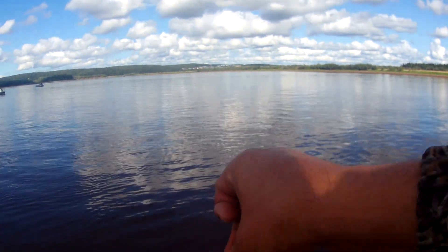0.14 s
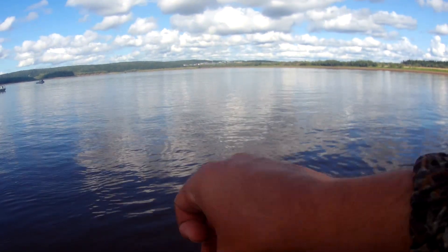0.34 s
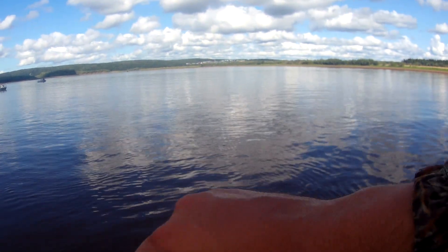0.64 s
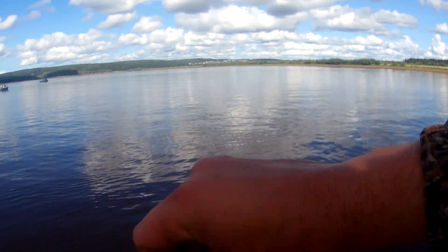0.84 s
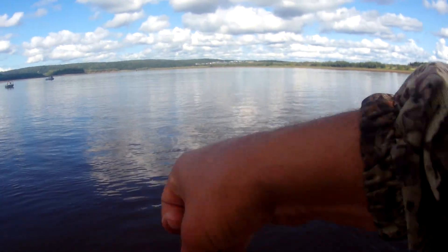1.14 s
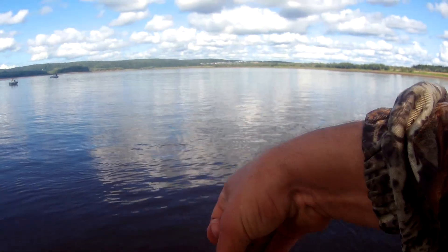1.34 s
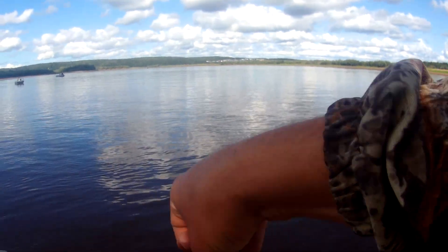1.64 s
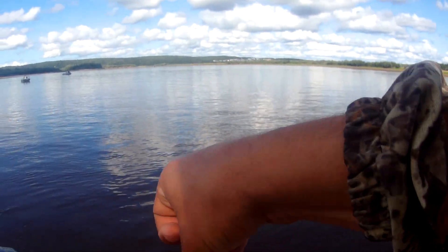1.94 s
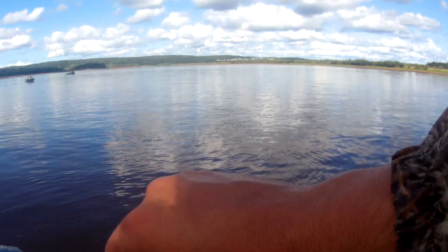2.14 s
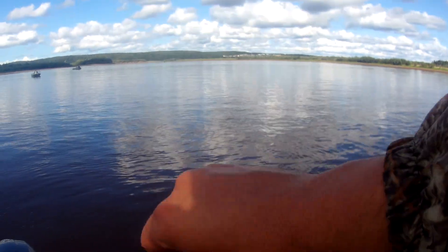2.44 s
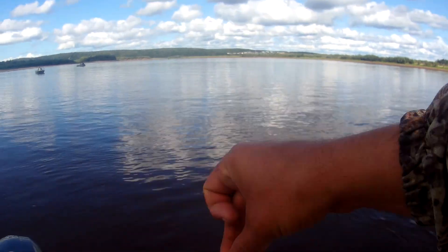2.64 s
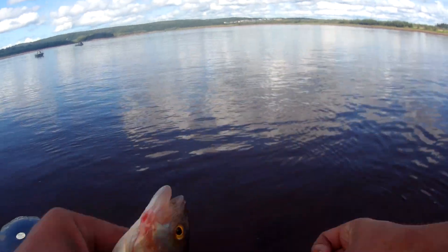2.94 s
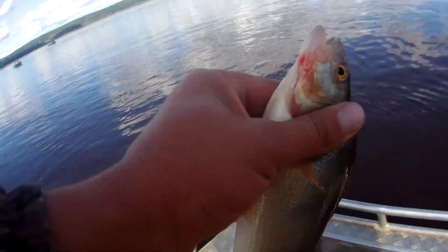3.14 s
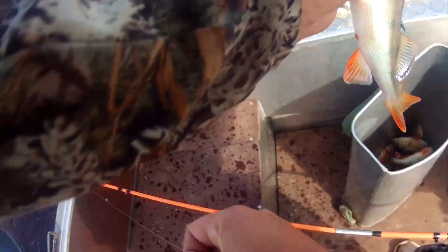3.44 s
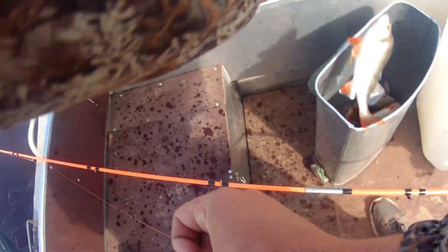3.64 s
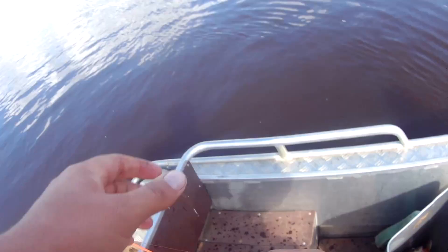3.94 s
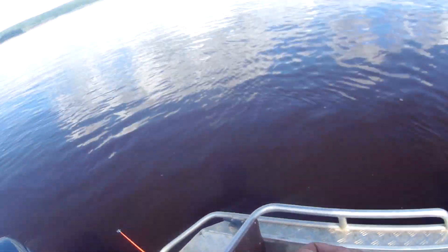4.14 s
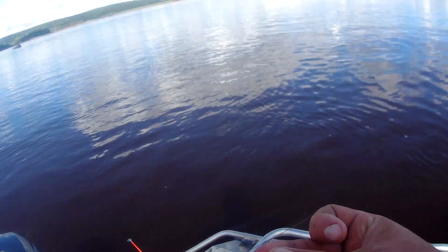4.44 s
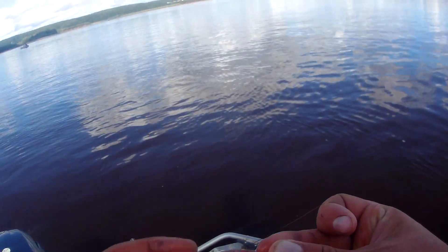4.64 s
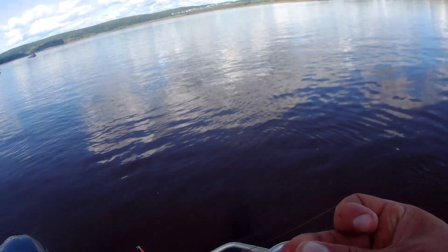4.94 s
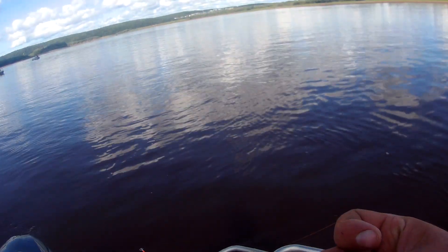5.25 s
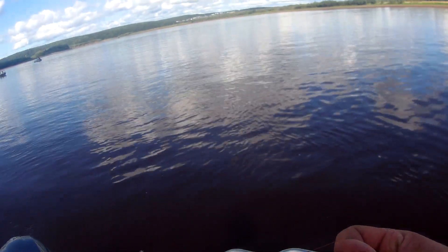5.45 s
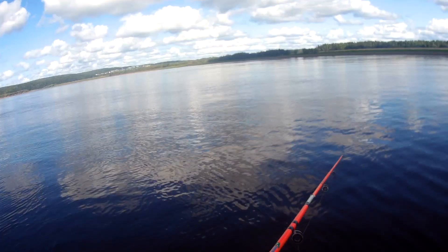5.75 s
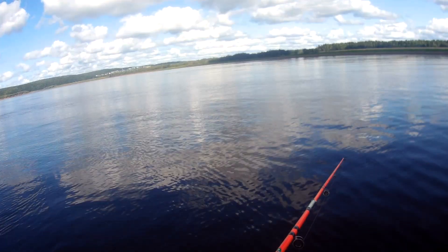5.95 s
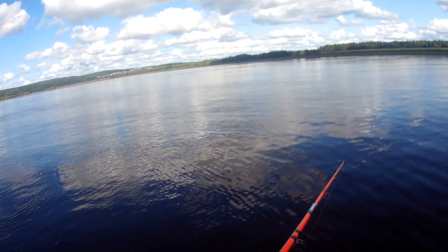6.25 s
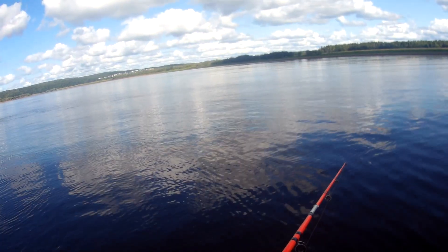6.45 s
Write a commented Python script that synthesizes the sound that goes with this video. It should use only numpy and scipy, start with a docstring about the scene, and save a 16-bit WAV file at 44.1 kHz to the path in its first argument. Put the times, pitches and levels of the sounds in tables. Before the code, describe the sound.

A close, body-worn microphone on an aluminium boat picks up broad, gently lapping water, faint flickering hiss and a low, wavering engine hum. From 0.4 to 1.4 s there are only faint ticks and a short rub. Light hollow knocks fall at 1.5 and 1.65 s, then a brighter, firmer double knock with ticks and rubbing around 2.0-2.2 s. Background alone fills the gap until a faint tap and soft sliding at 3.5 s. At 3.88-4.1 s comes the loudest moment: a tumbling clatter of thuds, clanks and sharp ticks, rough scraping and a dull low jolt that decays. Weaker knocks and rubs follow at 4.25-4.65 s, a solid double knock at 5.0 s, and ringing knocks at 5.3 and 5.5-5.6 s. At 5.6 s it cuts hard to a much quieter lake; rubbing ends, a thin, warbling, very high squeak slips at 5.7-5.8 s, then calm until a tiny dry tock at 6.53 s.

```python
"""Fishing gear on an aluminium boat

Hands and gear knock, tick and rub on the hull, close to a body-worn camera: decaying tones and shaped noise.
Engine hum (wavering low tones), the wash of the lake and hiss (filtered noise) lie underneath.
After a hard cut the lake is quieter: a thin, high squeak of gliding tones as the rod is worked,
the end of the rubbing, and one last small tock."""
import sys
import numpy as np
from scipy import signal
from scipy.fft import rfft, irfft
from scipy.io import wavfile

SR = 44100
rng = np.random.default_rng(int(sys.argv[2]) if len(sys.argv) > 2 else 0)


def output_pcm(signal):
    """Save a mono or channel-first signal as 16-bit PCM at the path in sys.argv[1].

    Samples are clipped to [-1, 1] before scaling.
    """
    pcm = np.clip(np.atleast_2d(signal).T, -1, 1) * 32767
    wavfile.write(sys.argv[1], SR, np.round(pcm).astype(np.int16))


N = 291545
T = np.arange(N) / SR  # time in seconds
# Throughout, a t60 is the time in seconds in which a sound dies away by 60 dB.


def amp(db):
    """Turns decibels into gain."""
    return 10 ** (np.asarray(db) / 20)


def rms(x):
    """Root mean square: the average strength of a signal."""
    return np.sqrt(np.mean(x ** 2) + 1e-20)


def read(points, hz):
    """Reads a curve of (Hz, value) points, joined by lines on a log-frequency axis."""
    f, value = np.transpose(points)
    return np.interp(np.log(hz + 1), np.log(f + 1), value)


def add(mix, s, sound):
    """Mixes a sound in at time s (seconds)."""
    part = mix[round(s * SR):][:len(sound)]
    part += sound[:len(part)]


def band(x, lo_hz, hi_hz, order=3):
    """Keeps the range between two frequencies, using past samples only."""
    edges = [lo_hz, min(hi_hz, .49 * SR)]
    return signal.sosfilt(signal.butter(order, edges, "band", fs=SR, output="sos"), x)


def noise(points, size=N):
    """Noise of a given spectrum, rms 1."""
    gain = amp(read(points, np.fft.rfftfreq(size, 1 / SR)))
    x = irfft(rfft(rng.standard_normal(size)) * gain, size)
    return x / rms(x)


def drift(rate):
    """Random wander of rms 1: 16 sines of up to the given rate (Hz), drawn on 4000 points and joined by lines."""
    t = np.linspace(0, N / SR, 4000)
    x = sum(np.sin(2 * np.pi * (f * t + rng.random())) for f in rate * rng.uniform(.1, 1, 16))
    return np.interp(T, t, x / rms(x))


def colour(x, points):
    """Filters with a gain curve of (Hz, dB) points, with no sound ahead of its cause (minimum phase)."""
    size = 4096
    log_gain = np.log(amp(read(points, abs(np.fft.fftfreq(size, 1 / SR)))))
    taps = np.fft.ifft(np.exp(np.conj(signal.hilbert(log_gain)))).real
    return signal.fftconvolve(x, taps[:size // 2])[:len(x)]


# Tones of the engine hum. Each row: pitch in Hz, level in dB rms before throb and sinking.
ENGINE_TONES = [(91.4, -47.5), (136.8, -52), (182.6, -53)]
# Tones of the fainter hum over the calm lake. Each row: pitch in Hz, level in dB rms before throb.
FAR_ENGINE_TONES = [(117.8, -61.5), (172.6, -62)]


def hum(lines, waver=0.0031, throb_db=2):
    """Low tones share one slightly wandering engine speed, while each throbs in level by itself."""
    clock = np.cumsum(1 + waver * drift(2.11)) / SR
    out = 0
    for hz, db in lines:
        level = np.sqrt(2) * amp(db + throb_db * drift(5.1))
        out = out + level * np.sin(2 * np.pi * (hz * clock + rng.random()))
    return out


# Spectrum of the wash beside the boat. Each row: frequency in Hz, relative level in dB per Hz.
WASH_SPECTRUM = [(20, -8), (40, -10.5), (280, 0.5), (450, -1.5), (850, -8), (1150, -18.5), (3200, -29.5),
                 (5600, -31.5), (12600, -35), (15700, -60)]
# Slow swell of that wash. Each row: time in seconds, level of its 200-1000 Hz range in dB before lapping.
WASH_SWELL = [(0, -43.5), (1.1, -43.5), (1.9, -41), (3.6, -44.5), (4.2, -39.5), (5.6, -41)]
# Spectrum of the calm lake. Each row: frequency in Hz, relative level in dB per Hz.
CALM_SPECTRUM = [(20, -22), (40, -3), (65, -16), (420, -19.5), (2200, -38.5), (5000, -42.5), (15700, -51)]
CALM_DB = -55.5  # level of its 200-1000 Hz range before lapping


def wash(points, db, lap_db=1.4):
    """Water and air over the lake make broad noise; its part below about 1200 Hz laps gently in level."""
    x = noise(points)
    body = band(x, 200, 1000)
    low = signal.sosfiltfilt(signal.butter(2, 1200, fs=SR, output="sos"), x)
    lapping = low * (amp(lap_db * drift(12)) - 1)
    return amp(db) * (x + lapping) / rms(body)


# Bands of microphone hiss. Each row: centre in Hz, width in Hz, level in dB rms before flicker.
HISS_BANDS = [(7440, 310, -66), (12850, 1500, -64)]


def hiss(flicker_db=3.5):
    """Bands of microphone hiss, made of filtered noise, flicker together in level."""
    out = 0
    for hz, width, db in HISS_BANDS:
        x = band(rng.standard_normal(N), hz - width / 2, hz + width / 2, order=1)
        out = out + amp(db) * x / rms(x)
    return amp(flicker_db * drift(22)) * out


# Strongest ringing modes of the hull. Each row: pitch in Hz, relative level in dB, t60 in seconds.
HULL_MODES = [(130, -11.5, 0.6), (184.3, 2, 0.32), (265.3, 5.5, 0.19), (375.6, 0, 0.17), (465, -3.5, 0.3),
              (530.4, -3.5, 0.21), (621, -3.5, 0.39), (715, -0.5, 0.27), (773, -0.5, 0.43), (827, -1, 0.19),
              (1135, -6, 0.24), (1406, -3.5, 0.16), (1841, -9.5, 0.16)]
# The crowd of weaker sheet modes between them. Each row: frequency in Hz, relative level in dB per Hz.
SHEET_SPECTRUM = [(70, -8), (160, 6), (400, 1), (750, 6), (1400, 0), (2000, -2.5), (2500, -15),
                  (4400, -15.5), (5600, -26.5), (8000, -21.5), (9500, -38), (15000, -46)]
# How long that crowd rings. Each row: frequency in Hz, t60 in seconds.
SHEET_DECAY = [(150, 0.39), (700, 0.53), (1500, 0.26), (4000, 0.11), (12000, 0.12)]


def hull_ring(hold, modes_db=3.5, spread_db=2.0, detune=0.0072):
    """One blow excites strong modes, randomly weighted and detuned, among a crowd of weak ones; hold scales t60."""
    t = T[:SR // 2]
    hz, db, t60 = np.transpose(HULL_MODES)[:, :, None]
    place, angle, load = rng.standard_normal((3, len(HULL_MODES), 1))
    hz = hz * (1 + detune * load)
    level = amp(db + spread_db * place - 60 * t / (t60 * hold))
    modes = (level * np.sin(2 * np.pi * (hz * t + angle))).sum(0)
    # the crowd is noise that dies away at its own speed at each frequency
    f, when, z = signal.stft(noise(SHEET_SPECTRUM, len(t)), SR, nperseg=256)
    fade = amp(-60 * when / (hold * read(SHEET_DECAY, f)[:, None]))
    crowd = signal.istft(z * fade, SR, nperseg=256)[1][:len(t)]
    return amp(modes_db) * modes / rms(modes) + crowd / rms(crowd)


# Light ticks of tackle. Each row: start in seconds, peak in dB without the hull's answer, pitch of tick in Hz.
TACKLE_TICKS = [(0.449, -42, 3000), (0.789, -35.5, 1150), (1.031, -36.5, 8300), (1.393, -32.5, 1000),
                (1.412, -35, 900), (1.444, -39, 8500), (1.9002, -37.5, 1900), (2.036, -30.5, 1500),
                (2.1464, -26.5, 4250), (3.746, -34.5, 5400), (3.806, -30, 5270), (3.882, -24.5, 6300),
                (3.8947, -18, 6270), (4.016, -27, 8040), (4.3378, -30.5, 4880), (4.5603, -32, 6500),
                (4.6298, -29, 8000), (5.2139, -34.5, 3800), (5.245, -33.5, 4500)]


def ticks(t60=0.028, ring_db=-6, ring_t60=0.057, hull_db=-7):
    """A small hard contact gives a noise snap, a short ring at its own pitch and a fainter answer from the hull."""
    out, t = np.zeros(N), T[:SR // 10]
    for s, db, hz in TACKLE_TICKS:
        snap = band(rng.standard_normal(len(t)), 900, 14000, order=2)
        snap = band(snap, hz / 1.5, hz * 1.5, order=1)
        ring = amp(ring_db - 60 * t / ring_t60) * np.sin(2 * np.pi * hz * t)
        tick = snap / rms(snap) * amp(-60 * t / t60) + ring
        answer = hull_ring(hold=1.0)
        add(out, s, amp(db) * tick / abs(tick).max())
        add(out, s, amp(db + hull_db) * answer / abs(answer).max())
    return out


# Sleeve and gear sliding over metal. Each row: start in seconds, length in seconds,
# level in dB before graining, resonance in Hz, extra treble in dB.
RUB_STROKES = [(1.155, 0.11, -41, 3180, 1.5), (1.423, 0.22, -43, 760, -1.5), (1.915, 0.044, -39, 2590, -3),
               (2.169, 0.092, -35, 736, 0), (3.434, 0.29, -44, 1240, -0.5), (3.875, 0.19, -33.5, 1090, 7.5),
               (4.043, 0.034, -29.5, 1140, -1), (4.094, 0.35, -38.5, 1240, 2.5),
               (4.222, 0.044, -45, 7700, 27), (4.401, 0.69, -44.5, 730, 0.5), (5.43, 0.2, -39.5, 1000, -2),
               (5.698, 0.16, -50.5, 750, 6)]
# Spectrum common to the strokes. Each row: frequency in Hz, relative level in dB per Hz.
RUB_SPECTRUM = [(100, 6), (800, 4.5), (2000, -3), (2600, -13.5), (4400, -7.5), (5500, -20.5), (8000, -9.5),
                (9500, -19), (15000, -23)]


def rubs(grain_db=1.0, grain_rate=420, metal_db=-12, surge_db=1.14, surge_rate=25,
         resonance_db=6, resonance_octaves=0.47, treble_hz=5200,
         catch_rate=24, catch_db=2.5, catch_s=0.0038):
    """Grained noise strokes slide with their own resonance and sheen, catch at random and set the hull ringing."""
    dry, hz = np.zeros(N), np.geomspace(100, 15000, num=60)
    for s, length, db, centre_hz, treble_db in RUB_STROKES:
        resonance = resonance_db * np.exp(-(np.log2(hz / centre_hz) / resonance_octaves) ** 2)
        shape = read(RUB_SPECTRUM, hz) + resonance + treble_db * (hz > treble_hz)
        size = int(length * SR)
        stroke = noise(list(zip(hz, shape)), SR)[:size]
        add(dry, s, amp(db) * signal.windows.tukey(size, .6) * stroke)
    grain = amp(grain_db * drift(grain_rate) + surge_db * drift(surge_rate))
    # catches: random jumps in level, catch_rate a second on average, that die away within milliseconds
    starts = rng.random(N) < catch_rate / SR
    catches = signal.lfilter([1], [1, -np.exp(-1 / (catch_s * SR))], starts)
    grain = grain * (1 + amp(catch_db) * catches)
    dry = dry * grain / rms(grain)
    metal = signal.fftconvolve(dry, band(hull_ring(hold=0.12), 310, 6000))[:N]
    return dry + amp(metal_db) * metal * rms(dry) / rms(metal)


def travel(x, delay_s):
    """Bending waves spread out on their way through the sheet: the lower, the later (delay_s at 200 Hz)."""
    hz = np.fft.rfftfreq(2 * len(x), 1 / SR)
    delay = delay_s * (200 / np.maximum(hz, 100)) ** .8
    turn = np.exp(-2j * np.pi * np.cumsum(delay) * hz[1])  # summed delay gives the phase
    return irfft(rfft(x, 2 * len(x)) * turn)[:len(x)]


def chatter(size, gap_s=0.0072, contact_s=0.00068, contact_db=3, settle_s=0.056, press_s=0.00054):
    """Gear never lands cleanly: a few quick, weakening contacts each lift the ring for an instant."""
    contacts = np.r_[0, np.cumsum(gap_s * rng.uniform(.4, 1.6, size=6))][:, None]
    age = np.maximum(T[:size] - contacts, 0)
    press = 1 - np.exp(-age / press_s)
    release = np.exp(-age / contact_s - contacts / settle_s)
    return 1 + amp(contact_db) * (press * release).sum(0)


def panel(hz, second_hz, hold, t60=0.13, second_db=-4):
    """The patch of sheet that is struck rings at two pitches of its own; hold scales t60."""
    t = T[:SR // 2]
    tones = np.sin(2 * np.pi * hz * t) + amp(second_db) * np.sin(2 * np.pi * second_hz * t)
    return amp(-60 * t / (t60 * hold)) * tones


# Blows on the hull. Each row: start in seconds, strength in dB, weight behind it as extra bass in dB,
# hardness as treble slope in dB per octave, ring time as a factor (under 1 when a hand damps it, at least 0.1),
# main and second pitch of the struck panel in Hz, early level of that panel against the strength in dB.
HULL_BLOWS = [(1.5155, -30.5, -3.5, 0.5, 0.71, 734, 4220, -3), (1.643, -40, 5, -1.5, 0.7, 705, 4170, -9),
              (1.993, -32, -2, -1, 0.85, 265, 1400, -6), (2.1595, -21, -19, -5, 0.59, 627, 946, -1.5),
              (2.175, -28, -4.5, -4.5, 0.93, 830, 602, -0.5), (3.492, -42, -16.5, -4.5, 0.18, 966, 896, 2),
              (3.881, -25.5, 3, -13.5, 1.2, 329, 167, -0.5), (3.892, -26.5, 1.5, -3.5, 0.5, 473, 960, -1),
              (3.907, -24.5, 5.5, -5.5, 0.42, 360, 1275, -2.5),
              (3.932, -22.5, -2.5, -8.5, 0.82, 553, 1027, -3), (3.98, -27.5, -0.5, -11, 0.94, 623, 458, 2),
              (4.0712, -18, -5.5, -8, 0.29, 1237, 470, -7), (4.083, -19.5, 0.5, -7, 0.78, 375, 527, 1),
              (4.096, -25, 4, -8, 0.73, 206, 259.5, 5), (4.254, -36.5, -3, -5, 1.2, 725, 782, 3.5),
              (4.398, -44.5, 5, -20, 0.4, 256, 192, 12), (4.512, -31, -8, -5.5, 0.29, 703, 1325, 4),
              (4.628, -35, -0.5, -5.5, 0.27, 406, 716, 0.5), (5.007, -26, -1.5, -3.5, 0.66, 1420, 1420, -2),
              (5.012, -22, 1, -6.5, 0.84, 640, 387, 2), (5.275, -29.5, 0, -4.5, 1.34, 190.4, 131, 2.5),
              (5.4879, -26.5, -3, -7, 0.6, 718, 682, 6), (5.499, -34.5, 2, -1, 1.3, 187.6, 254, 11.5),
              (5.592, -27, -10, -2.5, 1.4, 822, 1320, -5)]
# Centres of thump, ring, clang and crack, in Hz.
BLOW_CENTRES = [250, 750, 1550, 4000]
# Levels of thump, ring, clang and crack in a neutral blow, in dB against its strength.
BLOW_BALANCE = [-2, -1.5, -5, -3]


def knocks(rise_s=0.00093, travel_s=0.00508, hard_db=-8, soft_span_db=4):
    """Heavy, soft flesh drives the low modes and spreads out in time; hard gear drives the high ones at once."""
    out = np.zeros(N)
    edges = [80, 450, 1100, 2400, 15000]  # limits of thump, ring, clang and crack (Hz)
    early = SR // 36  # levels are set over the first 28 ms
    octaves = np.log2(np.divide(BLOW_CENTRES, BLOW_CENTRES[1]))
    for s, db, weight_db, hardness, hold, hz, second_hz, panel_db in HULL_BLOWS:
        hold = max(hold, .1)
        levels = db + np.array(BLOW_BALANCE)
        levels = levels + weight_db * (octaves < 0) + hardness * np.maximum(octaves, 0)
        ring = hull_ring(hold)
        contact = chatter(len(ring)) * (1 - np.exp(-T[:len(ring)] / rise_s))
        ring, note = ring * contact, panel(hz, second_hz, hold) * contact
        for _ in range(2):  # neighbouring ranges overlap, so the weights settle in two steps
            own = [20 * np.log10(rms(band(ring[:early], lo, hi))) for lo, hi in zip(edges, edges[1:])]
            ring = colour(ring, list(zip(BLOW_CENTRES, levels - own)))
        ring = ring + amp(panel_db + db) * note / rms(note[:early])
        softness = 1 / (1 + np.exp((hard_db - weight_db) / soft_span_db))  # more weight, nearer 1
        add(out, s, travel(ring, travel_s * softness))
    # the knocks carry little deep bass below about 94 Hz
    return signal.sosfilt(signal.butter(3, 94, "high", fs=SR, output="sos"), out)


# The first heavy blow jolts the camera: start (s), level before rise and decay (dB), t60 (s).
JOLT_S, JOLT_DB, JOLT_T60 = 3.885, -29, 0.79


def jolt(lo_hz=32, hi_hz=125, rise_s=0.0043):
    """A jolt through the camera's mount is a dull rumble of low noise that rises fast and dies away."""
    age = np.maximum(T - JOLT_S, 0)
    x = band(rng.standard_normal(N), lo_hz, hi_hz)
    return amp(JOLT_DB - 60 * age / JOLT_T60) * (1 - np.exp(-age / rise_s)) * x / rms(x)


# Slips of the squeak. Each row: start in seconds, length in seconds, level in dB rms before fades and flutter,
# middle pitch in Hz before arch, sag and warble.
SQUEAK_SLIPS = [(5.693, 0.02, -43.5, 11300), (5.717, 0.05, -35.5, 10670), (5.77, 0.029, -40.5, 10230)]
# Each slip arches in pitch (Hz), sags (Hz per second), and starts and stops quickly (s).
SLIP_ARCH_HZ, SLIP_SAG_HZ_PER_S, SLIP_EDGE_S = 353, 2100, 0.0044


def squeak(warble_hz=210, warble_rate=190, flutter_db=3.0):
    """As the rod is worked, a high tone slips a few times, with a fast, uneven warble in pitch and level."""
    out = np.zeros(N)
    warble = warble_hz * drift(warble_rate)
    flutter = amp(flutter_db * drift(150))
    for s, length, db, hz in SQUEAK_SLIPS:
        t = np.arange(0, length, 1 / SR)
        arch = SLIP_ARCH_HZ * (np.sin(np.pi * t / length) - .5)
        sag = SLIP_SAG_HZ_PER_S * (t - length / 2)
        pitch = hz + arch - sag + warble[round(s * SR):][:len(t)]
        level = amp(db) * np.minimum(np.minimum(t, length - t) / SLIP_EDGE_S, 1)
        add(out, s, np.sqrt(2) * level * np.sin(2 * np.pi * np.cumsum(pitch) / SR))
    return out * flutter


# Modes of the last tock. Each row: pitch in Hz, starting level in dB against the whole tock, t60 in seconds.
TOCK_MODES = [(430, -10, 0.016), (1290, -5, 0.024), (4440, -16.5, 0.0044)]
TOCK_S, TOCK_DB = 6.5312, -22  # start (s) and overall gain (dB)


def tock():
    """A small, well damped part of the tackle is tapped: a few tones that die within milliseconds."""
    out, t = np.zeros(N), T[:SR // 10]
    ring = sum(amp(db - 60 * t / t60) * np.sin(2 * np.pi * hz * t) for hz, db, t60 in TOCK_MODES)
    add(out, TOCK_S, amp(TOCK_DB) * ring)
    return out


CUT_S = 5.617  # time of the cut to the calm lake
HUM_SINK_DB = -3  # the hum sinks over half a second from the jolt on


def scene(calm_hiss_db=-4):
    """The busy boat, then a hard cut to the calm lake; the rubbing is heard on both sides."""
    engine = hum(ENGINE_TONES) * amp(HUM_SINK_DB * np.clip(2 * (T - JOLT_S), 0, 1))
    water = wash(WASH_SPECTRUM, np.interp(T, *np.transpose(WASH_SWELL)))
    busy = engine + water + hiss() + ticks() + knocks() + jolt()
    calm = hum(FAR_ENGINE_TONES) + wash(CALM_SPECTRUM, CALM_DB) + amp(calm_hiss_db) * hiss()
    calm = calm + squeak() + tock()
    return (np.where(T < CUT_S, busy, calm) + rubs())[None]


EDGE_HZ = 15700  # top of the camera's range


def record(dry):
    """The camera's band limit: a low-pass filter removes the highest treble."""
    low_pass = signal.firwin(511, EDGE_HZ, window=("kaiser", 9), fs=SR)
    return signal.oaconvolve(dry, low_pass[None], "same")


dry = scene()
out = record(dry)
output_pcm(out)
```